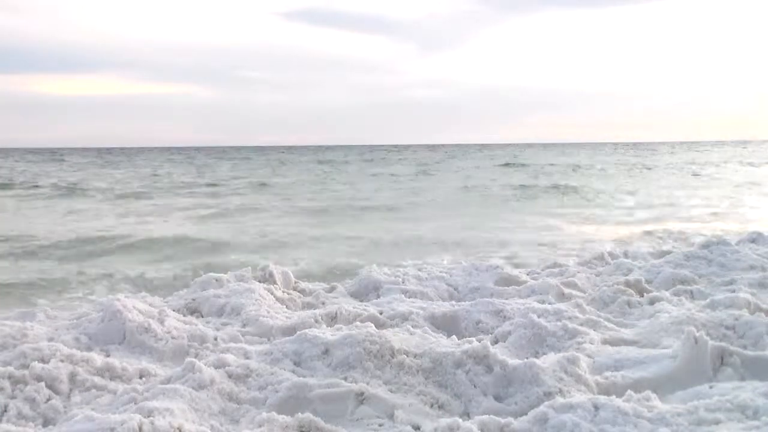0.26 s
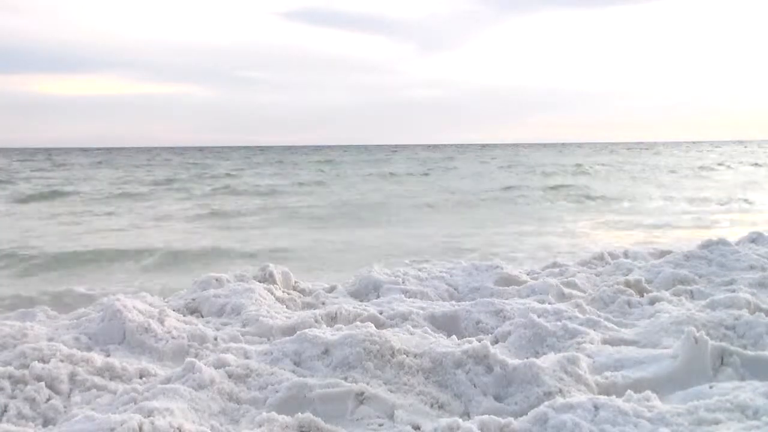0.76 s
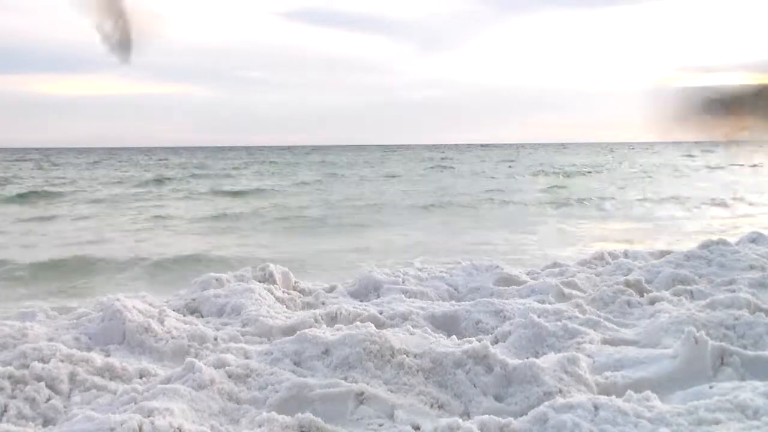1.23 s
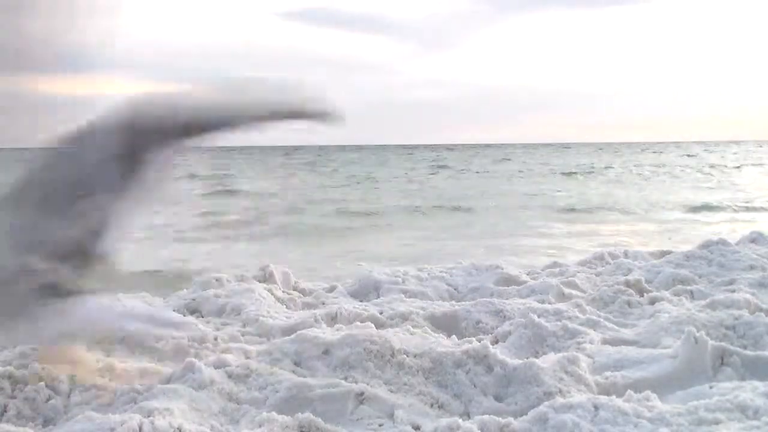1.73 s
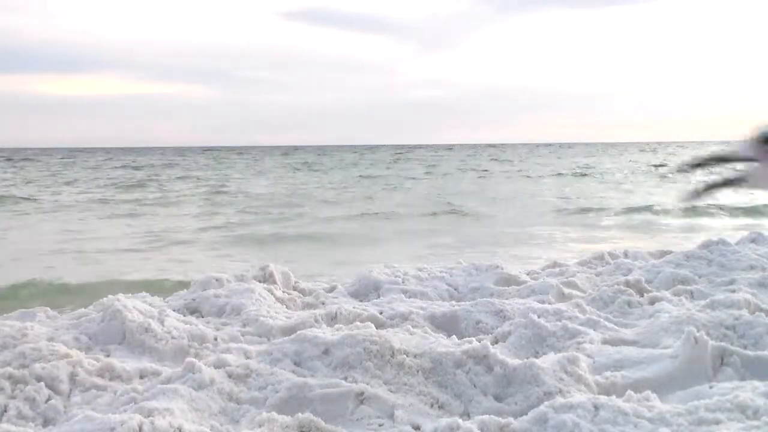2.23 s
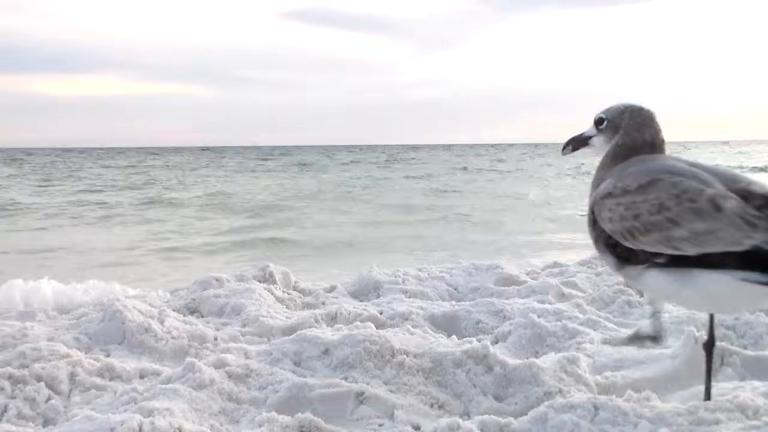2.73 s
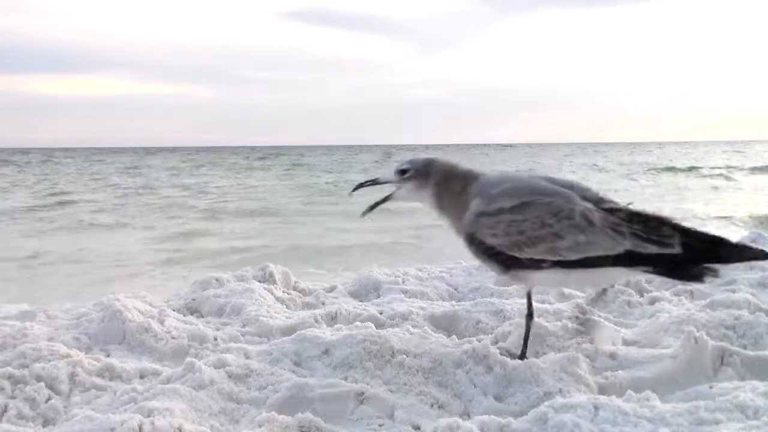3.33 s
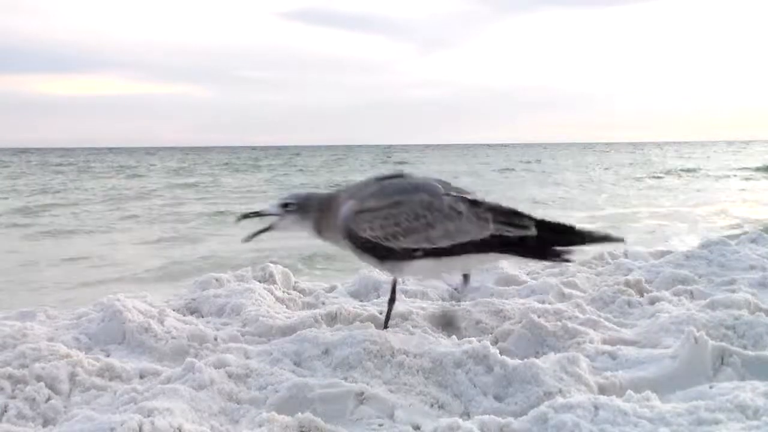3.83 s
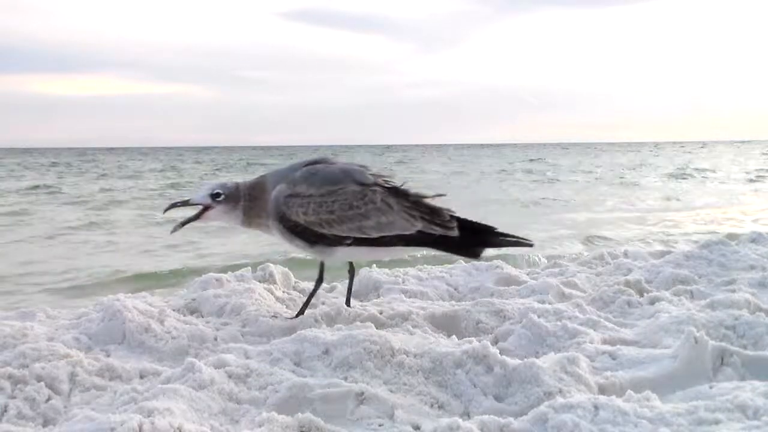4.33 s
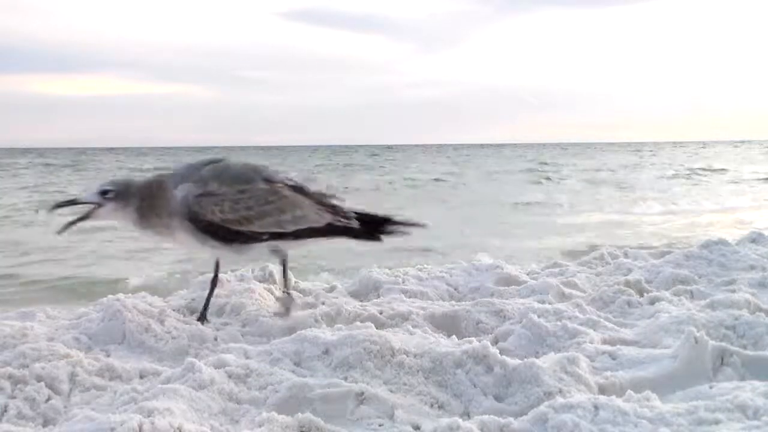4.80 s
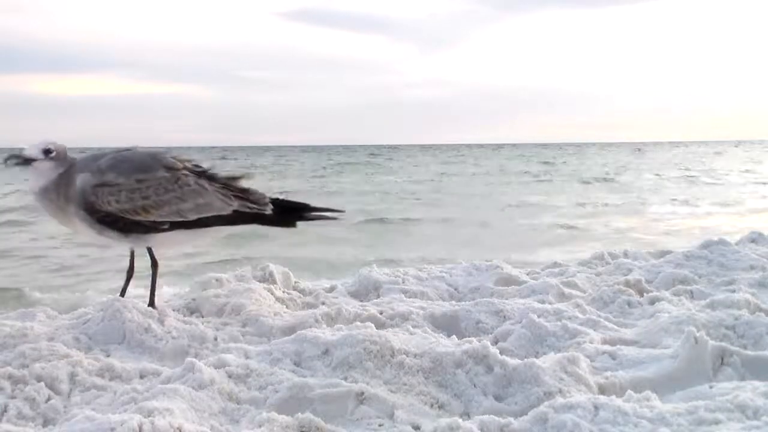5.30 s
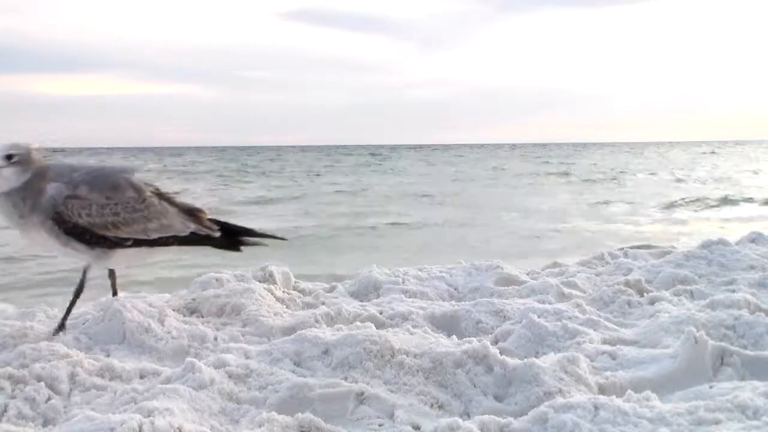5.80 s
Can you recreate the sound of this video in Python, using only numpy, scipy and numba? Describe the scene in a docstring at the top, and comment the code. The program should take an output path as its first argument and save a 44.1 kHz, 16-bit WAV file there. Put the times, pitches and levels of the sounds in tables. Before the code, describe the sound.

A gull cries immediately and very close, its hoarse squeal ending in a thin squeak, then pauses while low wind thumps the microphone. It calls again in short raspy squeals mixed with piercing whistles, about once a second until near the end. Steady surf hisses behind, wings brush past once, and foam ticks crisply. Outdoor stereo, close, automatically levelled so the background swells between calls.

```python
"""A gull cries at once and squeals on, close to two microphone ports, with surf hissing behind it.
Its throat pulses make rasps and cries from harmonics; a fast membrane makes clear whistles,
roughened by a slower one. Small clicks ring the bill.
Foam ticks and fizzes, wings rush past once, and gusts and slaps of wind shake both ports, all from shaped noise
or short bursts. A gain control turns the sound down quickly when it is loud and lets it back slowly."""
import sys
import numpy as np
from scipy import signal
from scipy.fft import rfft, irfft, next_fast_len
from scipy.io import wavfile
from scipy.ndimage import uniform_filter1d, map_coordinates
from numba import njit

SR = 44100
rng = np.random.default_rng(int(sys.argv[2]) if len(sys.argv) > 2 else 0)


def attenuation_scalar(level_db):
    """Turn a level in dB into a linear amplitude multiplier (20 dB per decade)."""
    decades = np.asarray(level_db, float) / 20
    return 10 ** decades


def file_out(sig):
    """Save sig as 16-bit WAV at sys.argv[1]."""
    # one column per channel
    cols = np.atleast_2d(sig).T
    # limit, then scale
    lim = np.clip(cols, -1, 1)
    pcm = np.round(lim * 32767).astype(np.int16)
    wavfile.write(sys.argv[1], SR, pcm)


N = 266893  # length in samples
TIME = np.arange(N) / SR  # seconds

# Tone of the sea, relative: pitch_hz, density_db (per Hz)
SURF_COLOUR = [(180, -31), (300, -2.5), (621, -5), (844, -21), (1460, -9.5), (2160, -19.5), (3080, -12),
               (4120, -23.5), (9090, -30.5), (14300, -37.5)]
# Strength of the surf over time: time_s, level_db
SURF_SWELL = [(0, -47), (1.5, -44), (3, -44), (4.5, -38), (6.05, -47)]
# Foam and sand ticking nearby: time_s, peak_db, centre_hz
FOAM_TICKS = [(2.3476, -26.5, 12800), (4.2757, -18, 8740), (4.5715, -23, 13000), (4.5992, -27.5, 8300),
              (4.6202, -18.5, 11300), (4.637, -31, 8290), (4.6862, -20, 8700), (4.7148, -22.5, 12200),
              (4.736, -24, 7600), (4.7764, -27, 12900), (5.1457, -19, 9300), (5.2106, -26, 9440),
              (5.4963, -32, 8250), (5.6531, -27.5, 8650), (5.698, -36, 7470), (5.7386, -31, 9250),
              (5.8267, -33, 9500), (5.9904, -35.5, 8850)]
# Fine fizz of tiny bubbles: time_s, level_db
FOAM_FIZZ = [(0, -59.5), (1, -63), (2.5, -61.5), (4, -73), (4.6, -59), (5.2, -49.5), (6.05, -61)]
# Air stirred by wings passing close: start_s, end_s, level_db (before the random throb)
WING_PASSES = [(1.602, 1.915, -38.5)]
# Gusts: time_s, peak_db (relative), rise_s, fall_s; rise and fall reach 20 dB under the peak
WIND_GUSTS = [(.08, -33.5, 0.077, 0.31), (.27, -22.5, 0.14, 0.29), (.54, -30, 0.28, .08),
              (.75, -35.5, .15, 0.089), (0.851, -27, .04, 0.092), (.92, -22.5, .1, 0.045),
              (1.025, -28, 0.025, 0.19), (1.197, -26, .015, 0.024), (1.15, -37.5, .3, 0.45),
              (1.77, -41, 0.62, 0.25), (2.421, -28.5, 0.38, 0.1), (2.58, -32.5, .12, .14),
              (2.759, -34, 0.23, .3), (2.9, -30, 0.21, 0.97), (3.39, -31, 0.16, 0.086),
              (3.54, -35.5, 0.21, 0.76), (3.84, -27.5, 0.088, .08), (4.03, -31.5, 0.58, 0.033),
              (4.479, -36, 0.63, 0.52), (4.68, -31, .4, 0.27), (4.8, -33.5, .3, 0.13),
              (5.112, -38.5, 0.45, 2.5), (5.62, -35.5, .5, 1), (6.041, -30.5, .03, .05)]
# Tone of the wind, relative: pitch_hz, density_db (per Hz)
WIND_COLOUR = [(12, -39), (20, -4.5), (86, -0.5), (202, -0.5), (441, -13.5), (482, -12.5), (586, -20),
               (1110, -28), (1400, -29), (1820, -59), (3080, -120)]
# Sudden slaps of air on the ports: time_s, strength_db (before the burst shape)
WIND_SLAPS = [(0.254, -30), (0.285, -23), (0.341, -28), (0.884, -23.5), (2.908, -30.5), (3.048, -33),
              (3.097, -26.5)]
# Cavity resonances of the right port alone: centre_hz, width_hz, added_gain_db
RIGHT_PORT_CAVITIES = [(3680, 870, -13), (5710, 840, -4)]
# Where the gull stands: time_s, left_minus_right_db, left_lag_ms
GULL_PLACE = [(0, 1, 0.039), (1.5, 1, 0.039), (2.2, 0.5, 0.033), (2.7, 0, -0.0018), (3.5, -0.5, -0.01),
              (4.5, 2, -0.019), (5.5, -1, -0.02)]
# Short clicks in the bill: time_s, peak_db
BILL_CLICKS = [(2.821, -29.5), (3.629, -28.5)]
# Ringing tones of the bill: pitch_hz, level_db (relative), t60_s (time to fall 60 dB)
BILL_RINGS = [(2100, -5, 0.059), (3058, -2, 0.049), (5384, -4.5, 0.021), (6580, -13, 0.016)]
# Clear whistles, one table a stretch: time_s, pitch_hz (before smoothing), level_db
WHISTLES = [
    [(1.338, 2925, -29), (1.355, 2804, -20.5), (1.39, 2902, -22.5), (1.42, 2834, -21), (1.445, 2877, -26),
     (1.476, 2950, -24.5)],
    [(2.547, 2966, -17.5), (2.58, 2900, -24), (2.655, 2847, -22), (2.68, 2820, -33)],
    [(3.175, 2685, -34), (3.19, 2752, -24.5), (3.3, 2943, -23.5), (3.33, 2920, -26), (3.35, 3003, -23),
     (3.39, 2914, -29.5), (3.445, 3005, -30.5), (3.49, 2890, -25), (3.52, 2905, -28), (3.555, 2786, -22),
     (3.57, 2774, -28)],
    [(4.004, 2960, -20), (4.15, 3058, -22.5), (4.21, 2997, -22), (4.24, 3003, -19), (4.27, 2927, -17.5),
     (4.376, 2777, -15), (4.418, 2604, -20.5)],
    [(4.928, 3058, -25), (5.0, 3092, -24), (5.078, 3210, -25.5), (5.1, 3100, -25.5), (5.125, 3136, -25),
     (5.148, 3267, -26), (5.175, 2986, -23), (5.225, 3130, -26), (5.25, 3014, -22.5), (5.264, 2793, -36)],
]
# A thin squeak: time_s, pitch_hz, level_db (before the random flicker)
THIN_SQUEAK = [(.6, 1810, -30.5), (.616, 1824, -31), (.636, 2700, -36), (.655, 2800, -41),
               (.665, 1914, -39), (.684, 1490, -34), (.692, 1404, -52)]
# Slower second membrane, a row for each ratio it locks to: start_s, end_s, share_of_pitch, side_tone_db
SECOND_MEMBRANE = [(1.381, 1.42, 0.36, -42.5), (1.424, 1.473, .41, -37.5), (2.548, 2.575, 0.43, -52),
                   (2.603, 2.68, 0.44, -50), (3.18, 3.206, 0.49, -55), (3.324, 3.525, 0.41, -42),
                   (4.13, 4.235, 0.39, -41), (4.223, 4.305, 0.39, -36), (4.337, 4.377, 0.44, -43),
                   (4.381, 4.41, .44, -30), (4.94, 5.0, 0.4, -45.5), (5.001, 5.055, .5, -45.5),
                   (5.055, 5.146, 0.37, -43), (5.147, 5.2, .38, -46), (5.2, 5.259, .38, -45)]
# Mixing tones of both membranes: fast_multiple, slow_multiple, level_db (relative)
MIXING_TONES = [
    [0, 1, -11],
    [1, -1, 0.5],
    [1, 1, 3],
    [2, -1, -3.5],
    [2, 1, -5],
    [1, 2, -14],
    [3, -1, -45],
    [3, 1, -22.5],
]
# Slow throat pulses, a row a stretch: start_s, end_s, first_rate_hz, last_rate_hz, level_db
RASPS = [(0.379, 0.407, 444, 531, -24), (0.406, 0.444, 445, 432, -24), (1.223, 1.247, 420, 470, -26),
         (1.247, 1.284, 459.5, 481, -27), (1.575, 1.613, 540, 500, -24), (1.613, 1.639, 461, 380, -24),
         (1.842, 1.878, 420.3, 546, -22), (1.872, 1.93, 434.4, 443, -22.5), (2.21, 2.235, 574, 550, -18),
         (2.427, 2.463, 420.4, 543, -21.5), (2.464, 2.491, 465.4, 470, -21),
         (2.749, 2.776, 453.6, 378, -27.5), (3.115, 3.149, 409, 525, -28.5), (3.147, 3.17, 478, 484, -28),
         (3.171, 3.188, 470, 439.6, -33), (3.594, 3.616, 430.3, 399.3, -24.5),
         (3.923, 3.962, 416, 543, -24.5), (4.414, 4.457, 428.3, 385, -19.5),
         (4.834, 4.886, 437, 493, -26.5), (5.381, 5.412, 546, 542, -27.5),
         (5.417, 5.441, 438.5, 374.7, -26)]
# Strong-weak pulse pairs, one table a stretch: time_s, pair_rate_hz, level_db, odd_lines_db, roughness (0-1)
CRIES = [
    [(0.0, 635, -35.5, -12, 0.39), (0.04, 638, -34, -16, .2), (0.145, 648, -26, -14, 0.27),
     (0.176, 602, -16.5, -4.5, 0.27), (0.205, 520, -24, 12, .15)],
    [(0.444, 617.2, -23.5, -11, 0.16), (0.47, 635, -26, -4, 0.16), (0.488, 664.7, -22, -1, 0.15),
     (0.5, 707, -32.5, -21, 0.04), (0.515, 657, -21.5, -23, 0.2), (0.531, 651.1, -27.5, -25, 0.25),
     (0.556, 631.7, -23.5, -32, 0.1), (0.575, 609.4, -24, -24, 0.04), (0.6, 635, -27, 5, 0.36)],
    [(1.285, 627, -27.5, -19, 0.26), (1.325, 643, -26.5, 1, 0.24), (1.34, 705, -29, 4, 0.15)],
    [(1.476, 578, -21.5, -27, 0.27), (1.51, 621.7, -23.5, -15, 0.23), (1.574, 586.8, -25, 1, 0.28)],
    [(1.931, 582, -19, -10, 0.15), (1.96, 615, -27.5, -11.5, 0.17), (2.134, 633.7, -27, -5, 0.26),
     (2.208, 596, -16, -2, 0.07)],
    [(2.492, 602, -20.5, -2, 0.28), (2.548, 686, -23, -6, 0.05)],
    [(2.655, 680, -31, -6, .3), (2.676, 665, -24, 0, .4), (2.683, 592, -24, 3, .3),
     (2.748, 552, -29.5, -4, 0.28)],
    [(3.565, 664.5, -22, -13, 0.13), (3.594, 566, -28, 20, 0.34)],
    [(3.962, 641, -13.5, -1, 0.37), (3.994, 621, -23, 3, .14), (4.004, 681, -21, -5, 0.05)],
    [(4.887, 572.6, -26, -32, .12), (4.909, 648.5, -26.5, -12, 0.04), (4.928, 650, -33, -4.5, 0.3)],
    [(5.262, 658, -28, -1, .36), (5.28, 575, -29, -13, 0.1), (5.308, 605, -32.5, -15, 0.46),
     (5.324, 646, -27, -10, 0.17), (5.378, 558.4, -26, -5, 0.33)],
]
# Tone of the throat: pitch_hz, gain_db
THROAT_COLOUR = [(400, -7), (900, -13), (1300, -2.5), (1750, 2.5), (2600, 0), (3600, 3), (4350, -5.5),
                 (4700, 6.5), (5800, 9), (7000, 2.5), (8000, -11.5), (9800, -8.5), (13000, -27)]
# Opening of the bill: time_s, mouth_resonance_hz, treble_db (added above 4400 Hz)
MOUTH_OPENING = [(0,3300,-11),(.14,3370,-14),(.16,2500,-11),(.205,2270,-17),(.378,2490,-15),(.4,2500,-12),(.41,3260,-14),
                 (.44,3420,-9),(.45,2680,-14),(.49,2970,-14),(.505,2570,-11),(.56,2570,-20),(.6,2660,-16.5),
                 (1.225,2720,-22),(1.245,2793,-9.5),(1.28,3270,-5),(1.29,2640,-12),(1.33,3080,-9.5),(1.48,2680,-17),(1.51,2850,-7),
                 (1.62,2280,-12.5),(1.845,2130,-16),(1.872,2100,-12),(1.882,3245,-8),(1.925,3550,-7.5),(1.935,2520,-13.5),
                 (2.134,2428,-7),(2.22,1872,-13),(2.43,2083,-17),(2.46,2030,-12),(2.47,2630,-11.5),(2.55,2620,-11.5),
                 (2.66,2240,-13),(2.7,2020,-6.5),(2.77,1820,-19.5),(3.12,2380,-14),(3.16,2775,-13.5),(3.57,2633,-15),
                 (3.61,2540,-19),(3.93,2680,-14.5),(4.0,2928,-8),(4.42,3310,-8.5),(4.455,3290,-24),(4.84,2920,-11.5),
                 (4.885,3180,-10),(4.91,2950,-14),(5.27,2610,-13),(5.38,2476,-12.5),(5.44,2100,-18)]

WING_HZ, WING_LEVELS_PER_S = 423, 13.8
LULL_DB = -47  # wind strength between gusts, on the scale of the gust table
EVEN_DB, LEAN_PER_DB = -24.5, 0.81  # strength that hits both ports alike; dB of lean per dB below it
OCTAVE_DB, OCTAVE_GROWTH = -34.5, 1.3  # octave at a whistle level of -24 dB; its dB per whistle dB
THIRD_DB = -21.5  # third harmonic of the whistle, relative to its octave
SECOND_EDGE_S, GLIDE_S = 0.006, 0.012  # the membrane is too sluggish for sharp corners in pitch
RISE_BEND, SAG_BEND = 1.3, 2.2  # powers of elapsed share: a rise climbs evenly, a sag falls late
RISE_ROUGH, SAG_ROUGH = 0.23, 0.42  # a sagging rasp is the hoarser
BREAK_OFF_HZ = 405  # a rasp ending below this rate dies away
FADE_S, FADE_DB = 0.0097, -7  # over its last moments
MOUTH_DB, MOUTH_WIDTH_HZ = 9.5, 1010
CRY_VOICE_DB = 2  # lift of the cry's second line, the rate of its single pulses
MID_SIDE = np.array([[1], [-1]])  # sign of the side noise at the left and right port


def walk(rate):
    """Random levels drawn `rate` times a second and smoothed twice; spread near 1."""
    hold = int(SR / rate)
    steps = np.repeat(rng.standard_normal(N // hold + 1), hold)
    return 1.15 * uniform_filter1d(uniform_filter1d(steps, hold), hold)[:N]


def colour(table, hz):
    """dB of a tone table at any frequency."""
    table_hz, db = np.transpose(table)
    return np.interp(np.log(hz), np.log(table_hz), db)


def curve(table):
    """Columns of a table at every sample."""
    times, *columns = np.transpose(table)
    return [np.interp(TIME, times, column) for column in columns]


def section(table, edge=0.002):
    """Sample numbers, soft on-off gate and columns of one stretch."""
    times, *columns = np.transpose(table)
    start, end = times[0] - edge, times[-1] + edge
    at = np.flatnonzero((TIME > start) & (TIME < end))
    gate = np.clip(np.minimum(TIME[at] - start, end - TIME[at]) / (2 * edge), 0, 1)
    return at, gate, [np.interp(TIME[at], times, column) for column in columns]


def noise_band(hz, octaves):
    """Two unrelated noises in one bell-shaped band, equally dense at any chosen centre."""
    size = next_fast_len(N)
    f = np.fft.rfftfreq(size, 1 / SR) + 1e-3  # avoids log of zero
    bell = np.exp(-(np.log2(f / hz) / octaves) ** 2)
    return irfft(rfft(rng.standard_normal((2, N)), size) * bell)[:, :N]


def level(x, db):
    """Scale to an rms level."""
    return x * attenuation_scalar(db) / np.sqrt(np.mean(x ** 2))


@njit
def follower(x, attack, release):
    """Envelope that rises fast and sinks slowly."""
    e, out = x[:2000].mean(), np.empty(len(x))
    for i in range(len(x)):
        e += (x[i] - e) * (attack if x[i] > e else release)
        out[i] = e
    return out


def surf():
    """Distant breakers: noise bands that flicker a little; alike in both ports only in the low range."""
    out = 0
    for hz in 300 * 2 ** np.arange(0, 5.7, 0.4):
        mid, side = noise_band(hz, 0.36)
        spread = np.clip(hz / 7300, 0.12, 1)
        gain = attenuation_scalar(colour(SURF_COLOUR, hz) + 1.3 * walk(9))
        out = out + gain * (mid + spread * side * MID_SIDE)
    return level(out, 0) * attenuation_scalar(curve(SURF_SWELL)[0])


def foam():
    """Bubbles burst: a few loud ticks over a random fizz of tiny ones."""
    ticks, t = np.zeros((2, N + 200)), TIME[:200]
    for s, db, hz in FOAM_TICKS:
        tick = np.sin(2 * np.pi * hz * t) * np.exp(-t / 0.00015)
        tick += 0.23 * rng.standard_normal(200) * np.exp(-t / 0.0026)
        first = int(s * SR)
        ticks[:, first:first + 200] += attenuation_scalar(db) * tick / np.abs(tick).max()
    bursts = rng.random(N) < 0.012  # chance of a tiny bubble at each sample
    grains = bursts * rng.standard_normal((2, N)) * attenuation_scalar(2.4 * rng.standard_exponential(N))
    grains = grains + 0.079 * grains[::-1]  # each port hears a little of the other's fizz
    band = signal.butter(2, [8000, 14000], "bandpass", fs=SR, output="sos")
    fizz = level(signal.sosfilt(band, grains), 0) * attenuation_scalar(curve(FOAM_FIZZ)[0])
    return ticks[:, :N] + fizz


def wings():
    """A soft rush of air, throbbing at random, while a bird flaps past."""
    out = np.zeros((2, N))
    air = level(noise_band(WING_HZ, 0.69), 0) * attenuation_scalar(4.7 * walk(WING_LEVELS_PER_S))
    for start, end, db in WING_PASSES:
        at, gate, _ = section([(start,), (end,)], 0.027)
        out[:, at] += gate * attenuation_scalar(db) * air[:, at]
    return out


def gusts():
    """Wind strength in dB: the strongest gust of the moment, never below the lull."""
    db = np.full(N, float(LULL_DB))
    for s, peak_db, rise, fall in WIND_GUSTS:
        db = np.maximum(db, peak_db - 20 * np.maximum((s - TIME) / rise, (TIME - s) / fall))
    return db


def wind():
    """Eddies strike each port on their own: bursts shared by all bands, brighter in strong gusts."""
    db = gusts()
    # in a lull the left port still catches air; gusts strike both
    pan_db = LEAN_PER_DB * (EVEN_DB - db)
    tilt_db = 0.042 * (db + 1.5)  # dB per octave
    out, burst = 0, np.array([walk(22.32), walk(21.86)])
    for hz in 22 * 2 ** np.arange(0, 6, 0.5):
        flutter = 2.6 * burst + 2.6 * np.array([walk(35), walk(35)])
        # the lean to one port fades towards the upper bands
        lean = np.clip(1.2 - hz / 147, 0, 1) * np.array([pan_db, -pan_db]) / 2
        air = noise_band(hz, 0.51)
        # small fast eddies are partly shared by the two ports
        air = air + min(hz / 900, 0.3) * air[::-1]
        out = out + attenuation_scalar(colour(WIND_COLOUR, hz) + flutter + lean + tilt_db * np.log2(hz / 120)) * air
    return level(out, 4.67) * attenuation_scalar(db)


def slaps():
    """A sharp eddy thuds on both ports for a few hundredths of a second."""
    hits, t = np.zeros(N), TIME[:3000]
    for s, db in WIND_SLAPS:
        hits[int(s * SR)] = attenuation_scalar(db)
    burst = np.exp(-t / 0.008) * (1 - np.exp(-t / 0.0005))
    shape = signal.fftconvolve(hits, burst)[:N]
    mid, side = noise_band(496, 1.11)
    return level(mid + 0.5 * side * MID_SIDE, 0) * shape


def bill():
    """Small hard clicks that ring the bill for a moment."""
    t, hits = TIME[:2000], np.zeros(N)
    ring = sum(attenuation_scalar(db) * np.sin(2 * np.pi * hz * t) * 1000. ** (-t / t60) for hz, db, t60 in BILL_RINGS)
    for s, db in BILL_CLICKS:
        hits[int(s * SR)] = attenuation_scalar(db) / np.abs(ring).max()
    return signal.fftconvolve(hits, ring)[:N]


def second_voice():
    """Ratio and strength of the second membrane: it locks to one ratio, then jumps to the next or rests."""
    share, gain = np.zeros(N), np.zeros(N)
    for start, end, ratio, db in SECOND_MEMBRANE:
        at, gate, _ = section([(start,), (end,)], SECOND_EDGE_S)
        share[at] = ratio
        gain[at] += gate * attenuation_scalar(db)
    return share, gain


def whistle():
    """A fast membrane gives a near sine with its octave; a slower one beats against it in side tones."""
    out, size, unsteady, flicker = np.zeros(N), walk(1800), walk(250), walk(70)
    share, side = second_voice()
    side = side * attenuation_scalar(2.1 * flicker)
    for table in WHISTLES:
        at, gate, (hz, db) = section(table)
        hz = uniform_filter1d(hz, int(GLIDE_S * SR), mode="nearest")
        octave_db = OCTAVE_DB + OCTAVE_GROWTH * (db + 24)
        fast = 2 * np.pi * np.cumsum(hz) / SR
        slow = 2 * np.pi * np.cumsum(share[at] * hz) / SR + unsteady[at]
        tone = attenuation_scalar(db) * np.sin(fast) + attenuation_scalar(octave_db) * np.cos(2 * fast)
        tone += attenuation_scalar(octave_db + THIRD_DB) * np.sin(3 * fast)
        mixing = sum(attenuation_scalar(d) * np.sin(round(a) * fast + round(b) * slow) for a, b, d in MIXING_TONES)
        tone += side[at] * mixing
        # the second membrane also makes the whistle hoarse
        hoarse = 1 + side[at] * attenuation_scalar(-db + 2.5) * size[at]
        out[at] += np.sqrt(2) * gate * tone * hoarse
    # the squeak wavers in pitch and flickers in level
    at, gate, (hz, db) = section(THIN_SQUEAK)
    phase = 2 * np.pi * np.cumsum(hz) / SR + 0.9 * unsteady[at]
    broken = attenuation_scalar(db + 2.5 * flicker[at]) * (1 + 0.9 * size[at])
    tone = np.sin(phase) + attenuation_scalar(-8.5) * np.sin(2 * phase) + attenuation_scalar(-18) * np.sin(3 * phase)
    out[at] += gate * broken * tone
    return out


def rasp_stretch(start, end, first_hz, last_hz, db):
    """Time, pulse rate, level, odd-line level and roughness along one rasp."""
    share, rising = np.linspace(0, 1, 9), last_hz > first_hz
    hz = first_hz + (last_hz - first_hz) * share ** (RISE_BEND if rising else SAG_BEND)
    fade = np.clip(1 - (1 - share) * (end - start) / FADE_S, 0, 1)
    level_db = db + (last_hz < BREAK_OFF_HZ) * FADE_DB * fade
    rough = np.full(9, RISE_ROUGH if rising else SAG_ROUGH)
    return list(zip(start + (end - start) * share, hz, level_db, np.zeros(9), rough))


def running_phase(tables):
    """One unbroken phase through all stretches of pulses."""
    rows = np.array(sorted(row[:2] for table in tables for row in table))
    return 2 * np.pi * np.cumsum(np.interp(TIME, *rows.T)) / SR


def pulsed_voice():
    """Rasp and cry: pulse harmonics coloured by throat and mouth, with random size and timing."""
    out, size, timing, pairing = np.zeros(N), walk(1300), walk(500), walk(300)
    hoarse, (mouth, treble_db) = walk(700), curve(MOUTH_OPENING)
    rasps = [rasp_stretch(*row) for row in RASPS]
    k = np.arange(1, 30)[:, None]  # harmonic numbers
    cycle = running_phase(rasps + CRIES)
    for table in rasps + CRIES:
        at, gate, (hz, db, odd_db, rough) = section(table)
        paired = table in CRIES
        rough = np.clip(rough, 0, 1)
        phase = cycle[at] + 0.45 * rough * timing[at]
        line_hz = k * hz
        line_db = colour(THROAT_COLOUR, line_hz)
        line_db += MOUTH_DB * np.exp(-((line_hz - mouth[at]) / MOUTH_WIDTH_HZ) ** 2)
        line_db += (line_hz > 4400) * treble_db[at]
        line_db += (k % 2) * odd_db + (k == 2) * paired * CRY_VOICE_DB
        gain = attenuation_scalar(line_db)
        gain /= np.sqrt(np.sum(gain ** 2, axis=0) / 2)
        # in the cry the strong-weak pairing keeps slipping, which smears the odd lines
        slip = (k % 2) * paired * 7.7 * rough * pairing[at]
        # turbulent air shakes every line on its own, the upper ones most
        slip = slip + (0.04 + rough) * (line_hz / 2900) ** 2 * hoarse[(at + 977 * k) % N]
        # higher lines lag a little, as the throat rings after each pulse
        tone = np.sum(gain * np.sin(k * phase - 0.1054 * k ** 2 + slip), axis=0)
        uneven = (1 + rough * size[at]) / np.sqrt(1 + rough ** 2)
        out[at] += gate * attenuation_scalar(db) * tone * uneven
    return out


def scene():
    """The gull reaches the ports with a small level and time difference; sea, wings and wind surround it."""
    pan_db, lag_ms = curve(GULL_PLACE)
    gull = pulsed_voice() + whistle() + bill()
    shift = lag_ms * SR / 2000  # half the lag for each port, in samples
    ports = np.array([map_coordinates(gull, [np.arange(N) - side * shift], order=3) for side in (1, -1)])
    left, right = ports * attenuation_scalar(np.array([pan_db, -pan_db]) / 2) + foam() + surf()
    right = right + sum(attenuation_scalar(db) * signal.lfilter(*signal.iirpeak(hz, hz / width, SR), right)
                        for hz, width, db in RIGHT_PORT_CAVITIES)
    return np.array([left, right]) + wind() + slaps() + wings()


def low_pass(x):
    """Removes everything above the highest recorded frequency."""
    return signal.sosfilt(signal.butter(12, 15170, fs=SR, output="sos"), x)


def record(dry):
    """Gain control, fast down and slow up; then rounded peaks and a steep treble cut."""
    attack_s, release_s = 0.00051, 0.25
    envelope = follower(np.abs(dry).max(axis=0), 1 / (attack_s * SR), 1 / (release_s * SR))
    gain = (attenuation_scalar(-14) / (envelope + attenuation_scalar(-34.5))) ** 0.86
    rounded = np.tanh(2.785 * dry * gain) / 2.434
    top_cut = signal.ellip(12, 0.2, 40, 14200, fs=SR, output="sos")  # low-pass at 14200 Hz
    return low_pass(signal.sosfilt(top_cut, rounded))


dry = scene()
out = record(dry)
file_out(out)
```